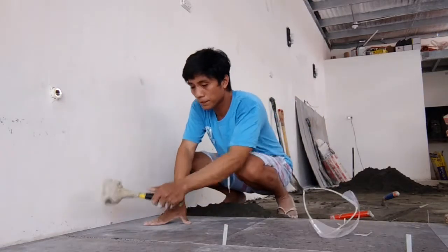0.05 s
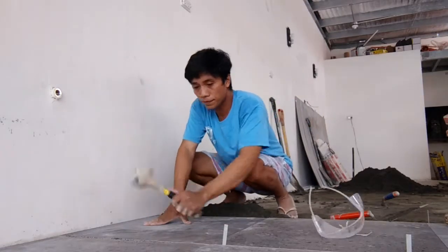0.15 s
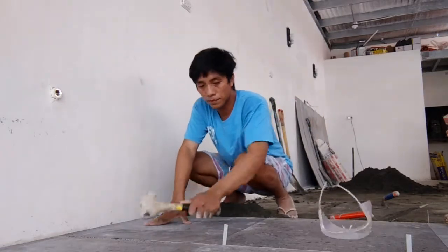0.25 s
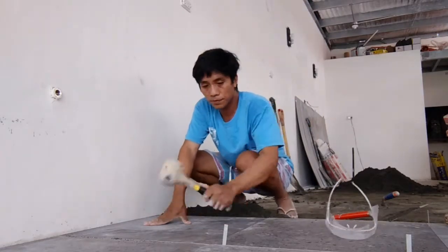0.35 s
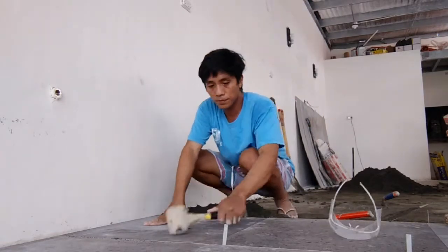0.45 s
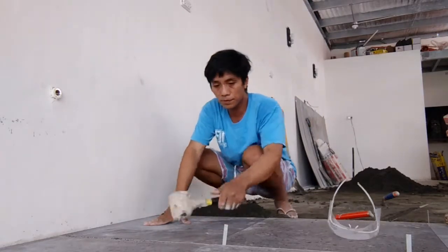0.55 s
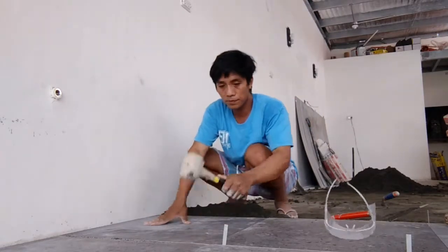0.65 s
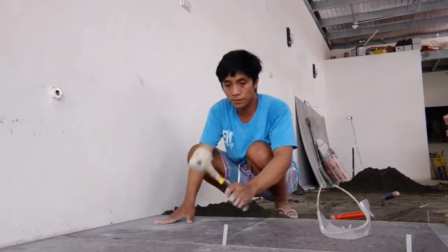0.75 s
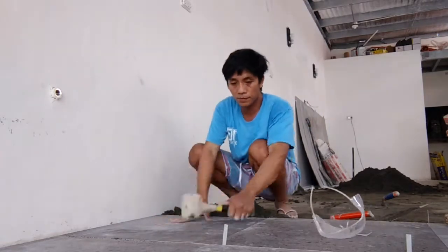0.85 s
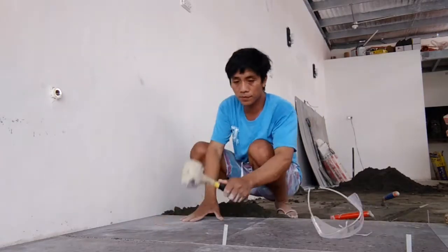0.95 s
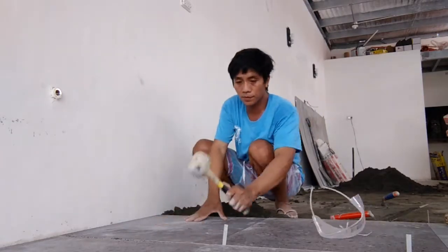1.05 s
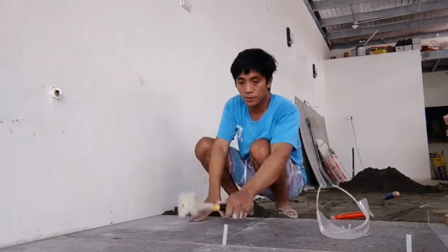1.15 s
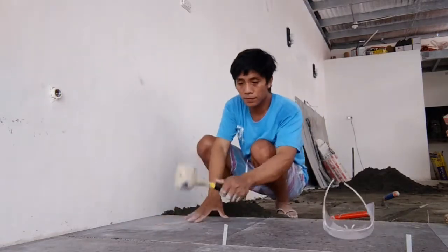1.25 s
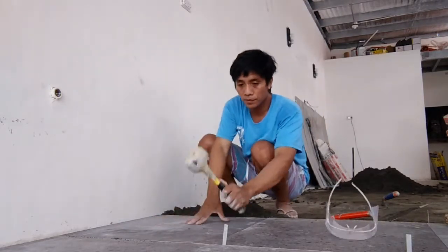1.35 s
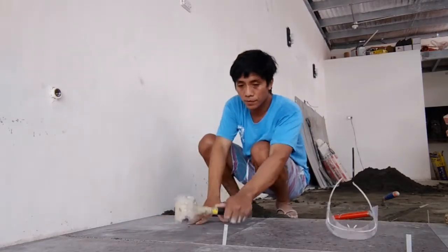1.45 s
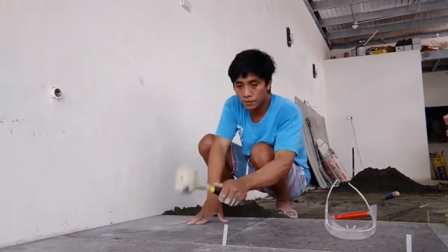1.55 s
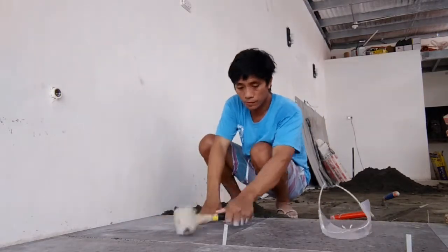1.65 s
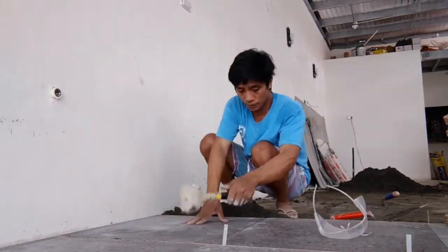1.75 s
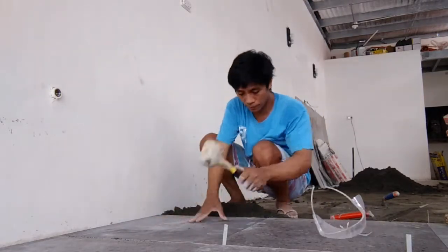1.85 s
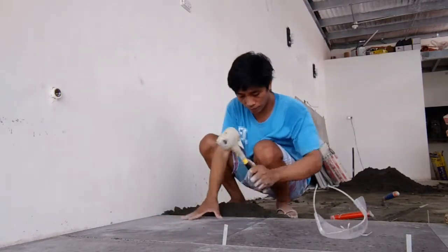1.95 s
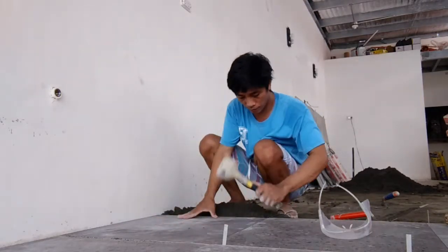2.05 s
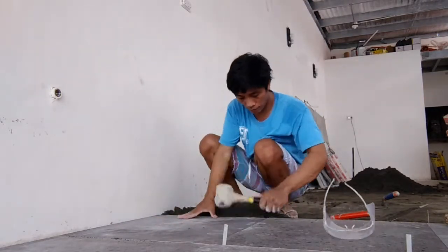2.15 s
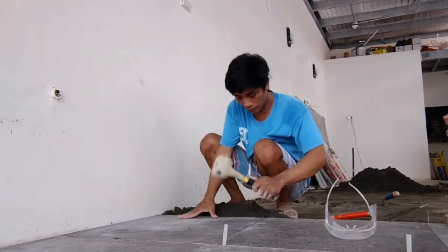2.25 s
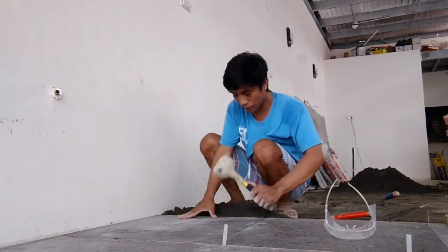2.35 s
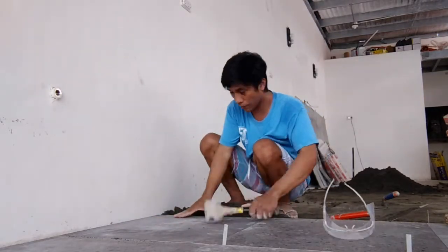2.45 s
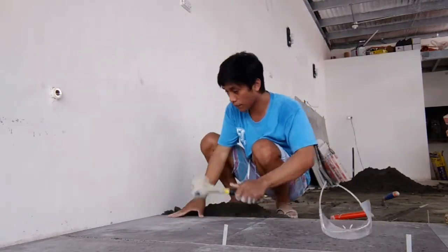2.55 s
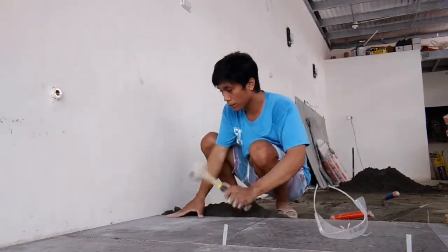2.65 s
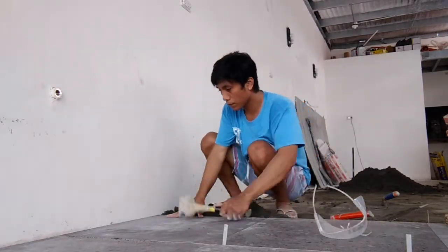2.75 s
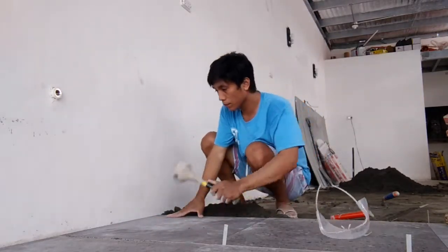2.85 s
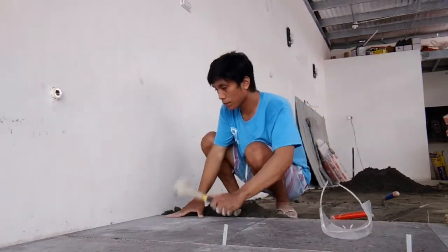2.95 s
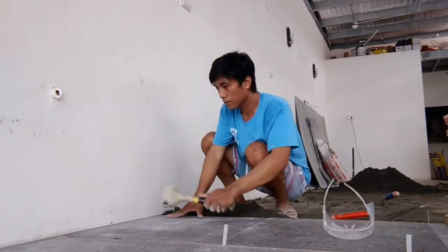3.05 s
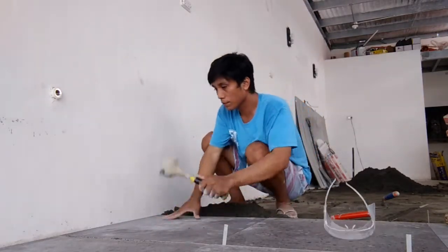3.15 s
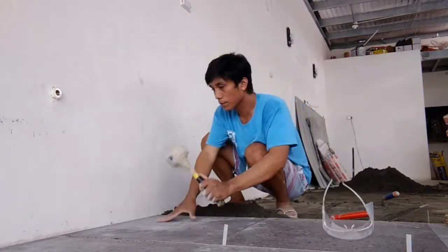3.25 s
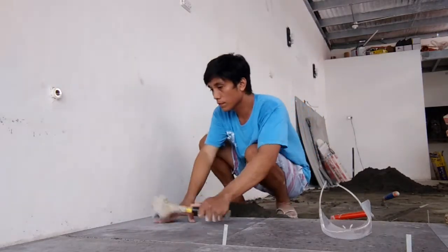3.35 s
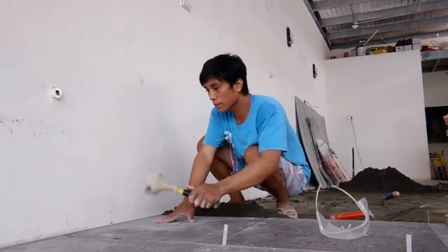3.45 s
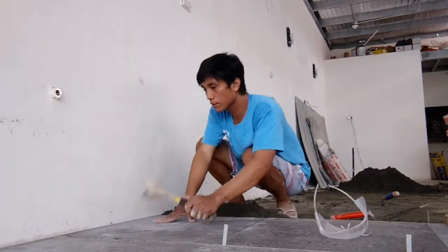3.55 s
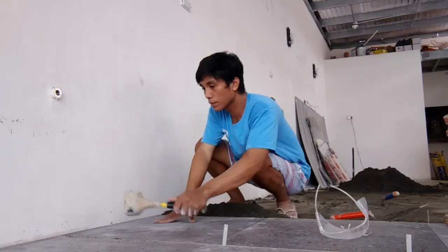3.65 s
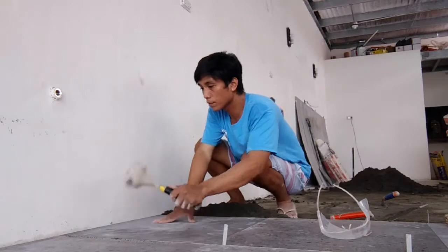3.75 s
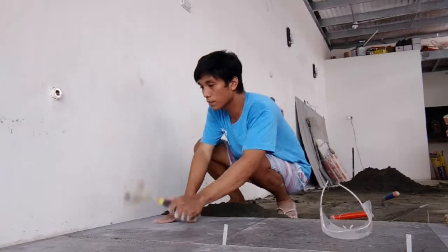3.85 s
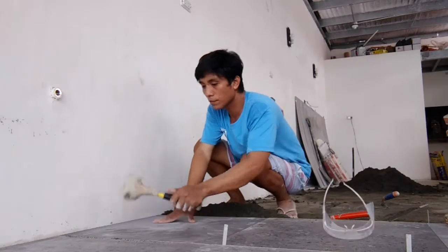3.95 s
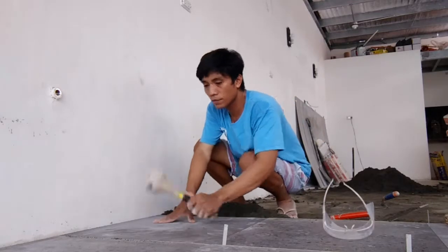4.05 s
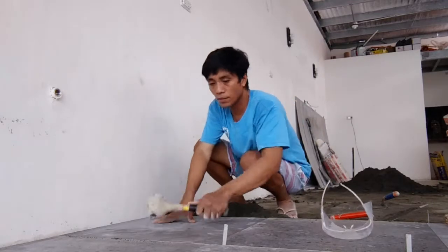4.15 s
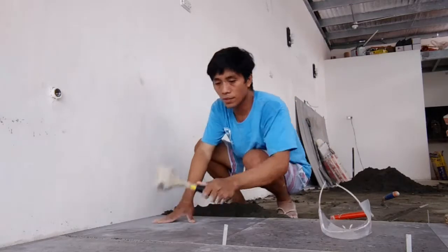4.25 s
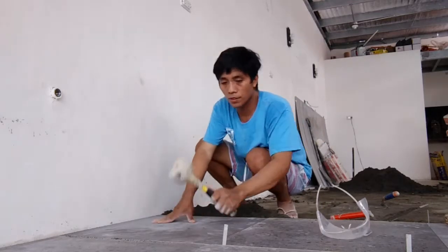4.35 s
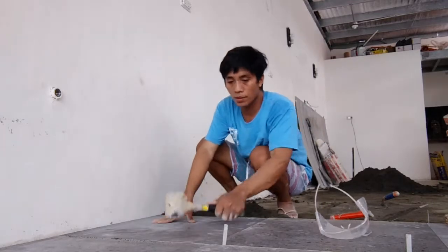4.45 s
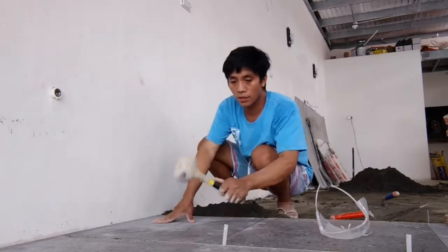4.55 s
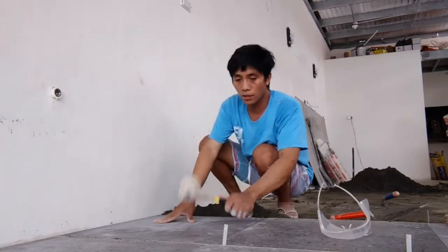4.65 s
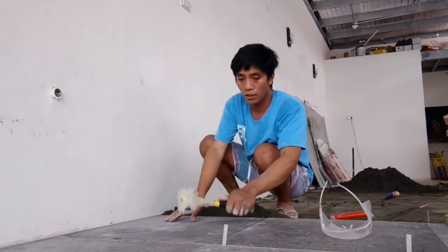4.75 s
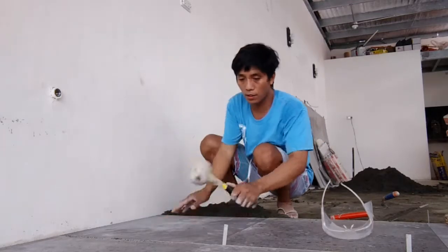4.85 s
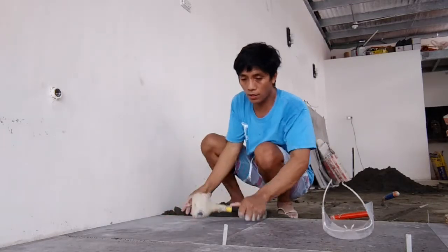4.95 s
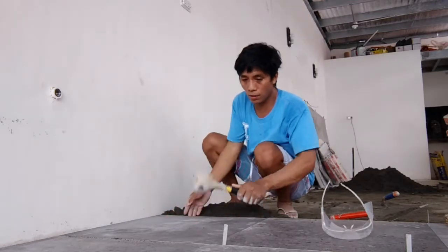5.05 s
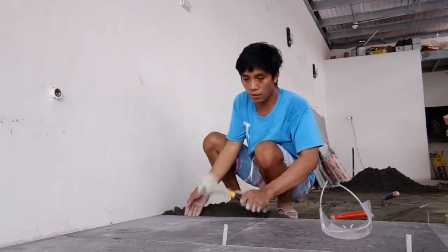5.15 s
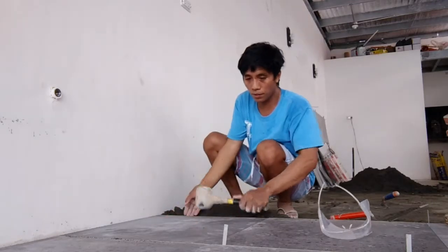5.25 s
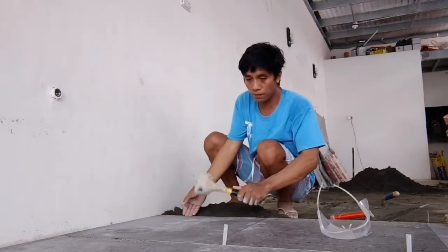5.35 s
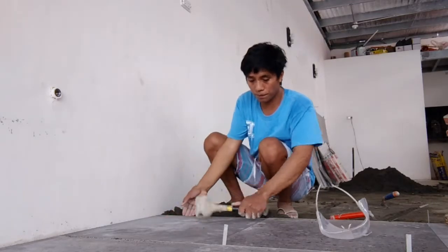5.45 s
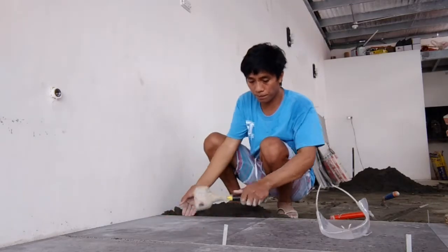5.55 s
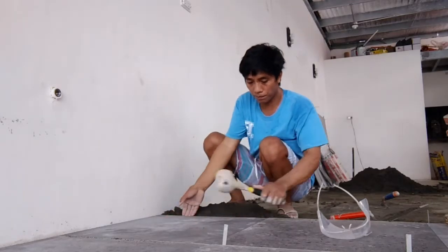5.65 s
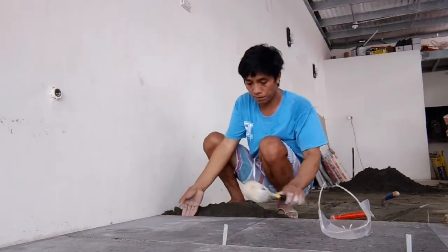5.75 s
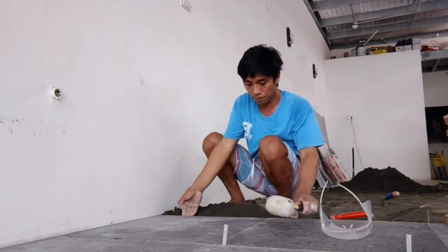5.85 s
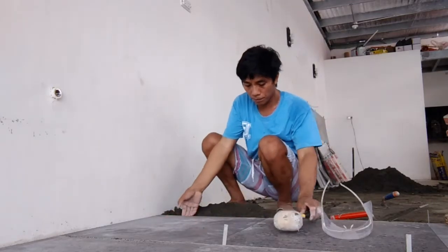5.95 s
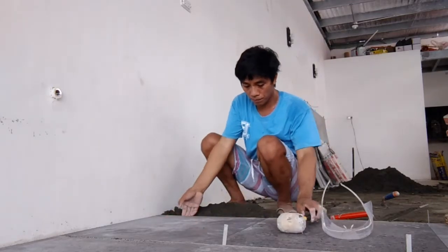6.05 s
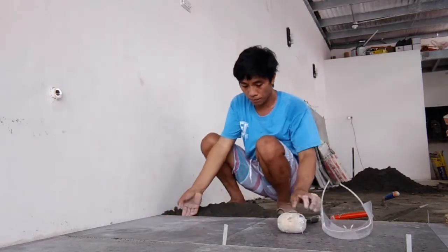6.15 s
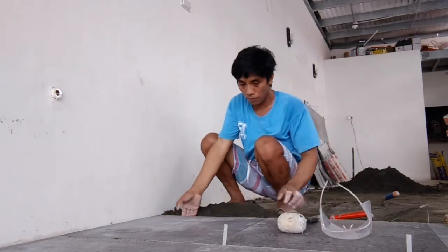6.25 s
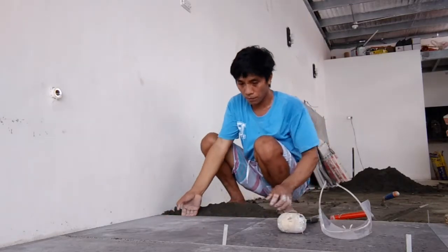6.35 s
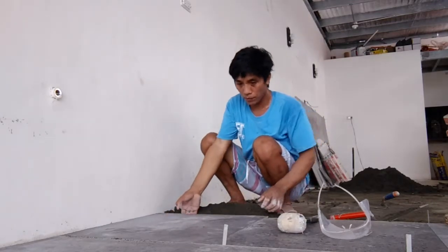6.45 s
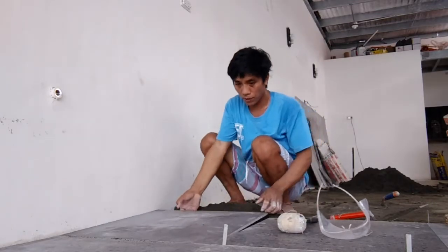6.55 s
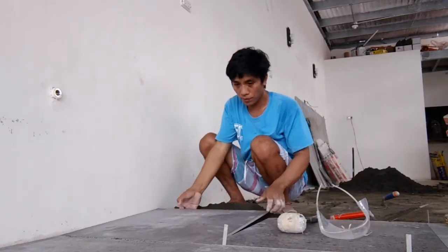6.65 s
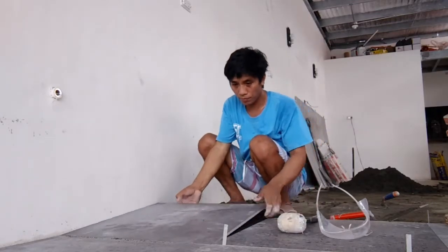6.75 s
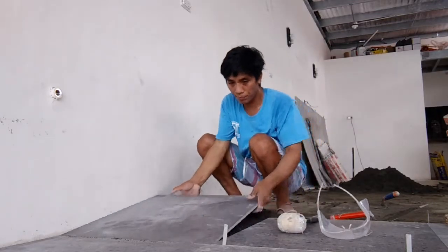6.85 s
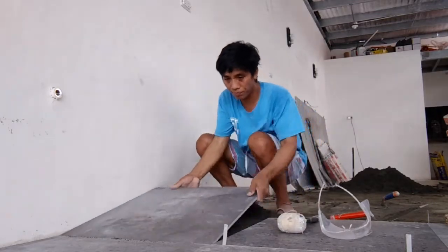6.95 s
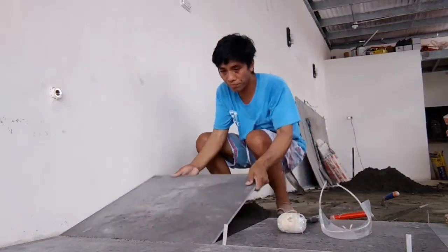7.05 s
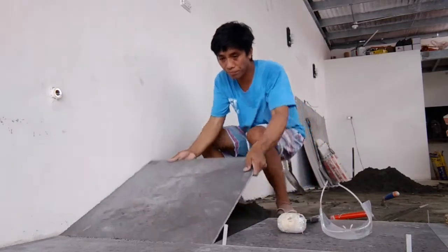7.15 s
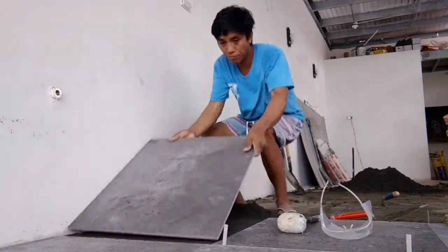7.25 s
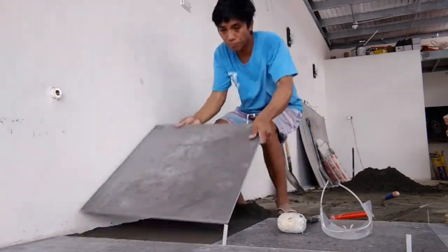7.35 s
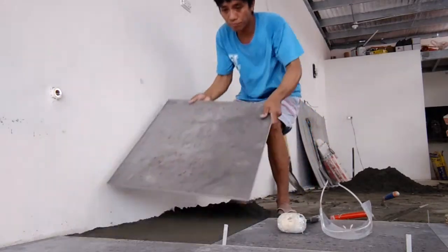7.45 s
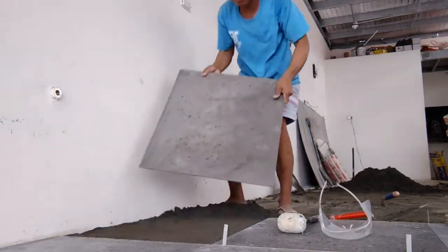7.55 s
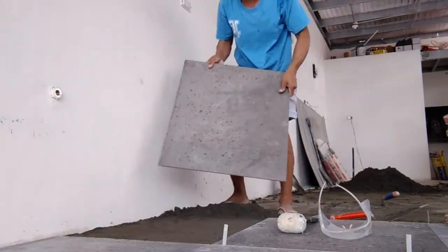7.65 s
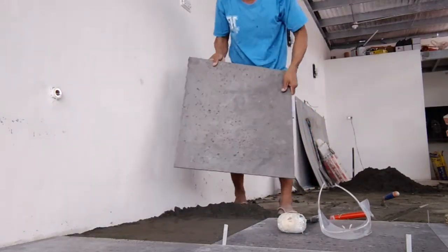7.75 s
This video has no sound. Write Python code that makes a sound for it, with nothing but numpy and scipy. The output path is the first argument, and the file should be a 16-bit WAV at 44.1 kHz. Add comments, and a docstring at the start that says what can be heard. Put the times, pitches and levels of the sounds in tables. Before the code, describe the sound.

Even, hollow mallet blows seat a floor tile in mortar, echoing off bare walls, followed by a few knocks and a soft rasp.

```python
"""A rubber mallet knocks a big floor tile into its mortar bed: twenty even blows in a bare, echoing room.
Each blow bends the tile and sets tile and room ringing; a limiter flattens the loudest moments.
Outdoor rumble comes in under the roof. Between blows a hand slides over the dusty tile, with light
taps and three faint chirps. Then the mallet is laid down and the tile is lifted: the mortar rasps,
and the tile's edge grazes a neighbour and rings."""
import sys
import numpy as np
from scipy import signal
from scipy.fft import rfft, irfft, next_fast_len
from scipy.io import wavfile
from scipy.ndimage import uniform_filter1d

SR = 44100
rng = np.random.default_rng(int(sys.argv[2]) if len(sys.argv) > 2 else 0)


def store_wav(level_fs):
    """Save 16-bit WAV to argv[1]."""
    pcm = np.round(np.clip(np.atleast_2d(level_fs), -1, 1) * 32767)
    wavfile.write(sys.argv[1], SR, pcm.T.astype(np.int16))


N = 343230
TIME = np.arange(N) / SR
HIT_SAMPLES = 32768  # long enough for one hit and its echo
HIT_TIME = np.arange(HIT_SAMPLES) / SR
HIT_HZ = np.arange(HIT_SAMPLES // 2 + 1) * SR / HIT_SAMPLES


def from_db(db):
    """Turn decibels into a number to multiply a sound by."""
    return 10 ** (np.asarray(db) / 20)


def unit_level(sound):
    """Scale a sound to an average (rms) level of 1."""
    return sound / np.sqrt(np.mean(sound ** 2) + 1e-20)


def at_pitch(rows, hz):
    """Read between the rows of a (pitch_hz, value) table, giving each octave equal space."""
    table = np.array(rows)
    return np.interp(np.log(np.maximum(hz, 1)), np.log(table[:, 0]), table[:, 1])


def add(out, start_s, sound):
    """Mix a sound in at its start time."""
    start = int(start_s * SR)
    part = sound[max(-start, 0):N - start]
    out[max(start, 0):][:len(part)] += part


def coloured(sound, tone):
    """Make each pitch louder or softer by a (pitch_hz, level_db) table."""
    size = next_fast_len(len(sound) + 4096, True)
    gain = from_db(at_pitch(tone, np.arange(size // 2 + 1) * SR / size))
    # minimum phase: nothing comes out before the sound goes in
    cepstrum = irfft(np.log(gain), size)
    cepstrum[1:size // 2] *= 2
    cepstrum[size // 2 + 1:] = 0
    return irfft(rfft(sound, size) * np.exp(rfft(cepstrum)), size)[:len(sound)]


def evened(sound, width_hz):
    """Even out the energy across bands of this width, as many paths together do."""
    power = uniform_filter1d(np.abs(rfft(sound)) ** 2, max(int(width_hz / HIT_HZ[1]), 1))
    gain_db = -10 * np.log10(np.maximum(power, .05))
    return coloured(sound, np.c_[HIT_HZ, gain_db][1:])


def noise(tone):
    """Steady noise with the given tone."""
    return unit_level(coloured(rng.standard_normal(N), tone))


def ringing(notes):
    """Struck notes, alternating in sign; each fades by 60 dB in its ring_s."""
    return sum((-1) ** k * from_db(db - 60 * HIT_TIME / ring_s) * np.sin(2 * np.pi * hz * HIT_TIME)
               for k, (hz, db, ring_s) in enumerate(notes))


def stirred(notes, width_hz):
    """Notes kept going by random pushes."""
    pushes = rng.standard_normal(N)
    return sum(from_db(db) * unit_level(signal.lfilter(*signal.iirpeak(hz, hz / width_hz, fs=SR), pushes))
               for hz, db in notes)


def stroke(peak_s, hold_s, level_db, rise_s, fall_s):
    """Loudness of one rub: it swells until peak_s, holds and dies away."""
    early = np.maximum(peak_s - TIME, 0)
    late = np.maximum(TIME - peak_s - hold_s, 0)
    return from_db(level_db) * np.exp(-early / rise_s - late / fall_s)


def with_echo(sound, room, echo_gain):
    """A sound plus the room's answer to it."""
    return sound + echo_gain * signal.fftconvolve(sound, room)[:N]


# How long the room's echo takes to fade by 60 dB: pitch_hz, ring_s
ROOM_RING = [(60, 0.25), (180, 0.37), (500, 0.42), (1500, 0.36), (4000, 0.41), (12000, .3)]

def room_echo(build_s):
    """Reflections crowd in, then die away, each band of pitches at its own pace."""
    spectrum = rfft(rng.standard_normal(HIT_SAMPLES))
    edges_hz = np.r_[0, np.geomspace(90, 2400, 13), 5000, 18000]
    build = 1 - np.exp(-HIT_TIME / build_s)
    out = np.zeros(HIT_SAMPLES)
    for low, high in zip(edges_hz, edges_hz[1:]):
        band = irfft(spectrum * ((HIT_HZ >= low) & (HIT_HZ < high)))
        band *= build * np.exp(-np.log(1000) * HIT_TIME / at_pitch(ROOM_RING, (low + high) / 2))
        out += band * np.sqrt(2 * (high - low) / SR / np.sum(band ** 2))  # equal energy per hertz
    return out


# Tone of the short snap as the tile bends: pitch_hz, level_db
SNAP_TONE = [(40, 13.5), (100, 29), (190, 49.5), (320, 28.5), (560, 34.5), (800, 28), (1000, 21),
             (1400, 27), (2000, 12.5), (3000, 2.5), (5000, -14), (9000, -19.5), (16000, -30)]

def tile_snap(lag_s=0.000473, spread_s=0.00183, knee_hz=560, near_wall_s=0.003152, scatter_s=0.00195):
    """Bending waves cross the tile, high ones first; the near wall repeats them at once."""
    delay_s = lag_s + spread_s / np.sqrt(1 + HIT_HZ / knee_hz)
    wave = np.exp(-2j * np.pi * np.cumsum(delay_s) * SR / HIT_SAMPLES)
    bounce_s = near_wall_s * rng.uniform(0.815, 1.196)
    bend = irfft(wave * (1 + np.exp(-2j * np.pi * HIT_HZ * bounce_s)))
    # grains of mortar and the tile's edges scatter the wave
    grains = rng.standard_normal(HIT_SAMPLES) * HIT_TIME * np.exp(-HIT_TIME / scatter_s)
    scattered = bend + grains / np.linalg.norm(grains)
    return coloured(evened(scattered, width_hz=400), SNAP_TONE)


# Mallet blows; a firmly bedded spot sounds brighter than a soft one: start_s, strength_db, bright_db
BLOWS = [(0.0516, -4, -1), (0.3113, -1.2, 0.6), (0.5598, -2, -0.5), (0.9321, -1, 0.5), (1.223, -0.7, 1.5),
         (1.5314, 0, 1), (1.7919, -0.5, 1), (2.2467, -6, 1.5), (2.5244, -4.5, 2.3), (2.8143, -5.5, 1),
         (3.086, -4.5, 0.2), (3.438, -1.5, -1.5), (3.69, -0.5, -0.5), (3.9539, -1.5, 0.2), (4.1984, 0, 0.5),
         (4.5121, -1, -0.6), (4.7862, -1, -0.5), (5.0586, -4, -1), (5.3286, -7.5, -0.5),
         (5.5751, -5.5, -0.2)]
# Tone of a blow as the walls send it back: pitch_hz, level_db
ECHO_TONE = [(40, 16.5), (70, 33), (120, 41), (200, 44), (290, 38), (480, 40.5), (750, 30.5), (1150, 25.5),
             (1420, 24.5), (2050, 20.5), (3000, 7.5), (4700, -6), (6500, -19.5), (15000, -34)]
# Long-ringing notes of tile and room: pitch_hz, level_db, ring_s
BLOW_NOTES = [(95.4, -24, 0.42), (108.7, -29.5, 0.74), (139.5, -21, 0.85), (155.7, -19.5, 0.47),
              (175.4, -19, 0.19), (182.3, -11.5, 0.73), (195.5, -14.5, 0.64), (213.1, -18, 0.89),
              (257.8, -17, 0.47), (315.5, -20.5, 0.5), (345.5, -21.5, 0.32), (397.4, -18.5, 0.58),
              (426.6, -24, 0.16), (448, -15, 0.43), (517, -19, 0.11), (510, -22.5, 0.11),
              (694.5, -17, 0.32), (824, -27, 0.35), (972, -24, 0.31), (1059, -27.5, 0.19),
              (1406, -22.5, 0.31), (1888, -26.5, 0.32), (2860, -41.5, 0.4)]

def mallet_blows(room, snap_db=-0.1, snap_follows=0.27, spot_db=3.0, spot_hz=1500):
    """Each blow lands on a new spot, so the tile bends differently and the echo takes other paths."""
    ring = ringing(BLOW_NOTES)
    pitches_hz = np.geomspace(60, 16000, 90)
    treble_share = at_pitch([(220, 0), (900, 1)], pitches_hz)
    middle_share = np.exp(-np.log(pitches_hz / spot_hz) ** 2)
    # low sounds find the same paths every time, high ones do not
    path_change = 1.03 * HIT_HZ ** 2 / (HIT_HZ ** 2 + 750 ** 2)
    # the far walls send back a cluster of reflections: 1.5 dB extra after 59 ms
    far_walls = from_db(1.5 * np.exp(-((HIT_TIME - 0.059) / 0.02) ** 2))
    out = np.zeros(N)
    add(out, -.22, coloured(room, ECHO_TONE) + ring)  # an earlier blow is still dying away
    for start_s, strength_db, bright_db in BLOWS:
        new_paths = room_echo(build_s=0.013)
        paths = irfft(np.cos(path_change) * rfft(room) + np.sin(path_change) * rfft(new_paths))
        echo = coloured(paths * far_walls, ECHO_TONE)
        snap = from_db(snap_db + snap_follows * strength_db) * tile_snap()
        blow = from_db(strength_db) * (echo + ring) + snap
        # the spot matters most for the middle pitches
        spot_tone_db = spot_db * middle_share * rng.standard_normal(len(pitches_hz))
        add(out, start_s, coloured(blow, np.c_[pitches_hz, bright_db * treble_share + spot_tone_db]))
    return out


# Tone of the outdoor rumble: pitch_hz, level_db
RUMBLE_TONE = [(25, -28), (42, -19.5), (60, -4), (85, 4), (125, 3.5), (170, -6.5), (260, 1), (350, -7),
               (550, -3.5), (1000, -10.5), (2000, -17.5), (4300, -32), (6500, -48.5), (15000, -72.5)]
# Low room notes that the rumble stirs: pitch_hz, level_db
BOOM_NOTES = [(58, -16.5), (141, -11), (196, -16.5)]
# Tone of the thin background hiss: pitch_hz, level_db
HISS_TONE = [(3000, 3), (6500, -5), (9500, 1), (12000, -15.5), (15500, -10.5)]
# One slow swell of rumble, boom and hiss together: time_s, level_db
OUTDOOR_SWELL = [(0, -35), (3, -36), (4, -33.5), (5, -27.5), (7.3, -29), (7.75, -32.5)]

def outdoor_rumble(rumble_db=-5.0, hiss_db=-38):
    """A distant rumble makes the room boom on its lowest notes, with a thin hiss on top."""
    cut_treble = signal.butter(2, 400, fs=SR, output="sos")
    boom = signal.sosfilt(cut_treble, stirred(BOOM_NOTES, width_hz=12.0))
    rumble = from_db(rumble_db) * noise(RUMBLE_TONE)
    hiss = from_db(hiss_db) * noise(HISS_TONE)
    swell = from_db(np.interp(TIME, *np.transpose(OUTDOOR_SWELL)))
    return swell * (rumble + boom + hiss)


# Strokes of the hand: peak_s, hold_s, level_db
HAND_STROKES = [(.272, .025, -51), (.795, .11, -43), (3.23, .05, -56), (3.86, .06, -59), (4.12, .06, -54)]
# Tone of skin brushing over dust: pitch_hz, level_db
SKIN_TONE = [(200, -16), (800, 7.5), (1900, 7), (2800, 0.5), (3800, 0), (5500, -18), (8500, -22.5),
             (11500, -30), (15000, -45)]
# Notes of skin squeaking on the tile: pitch_hz, level_db
SQUEAK_NOTES = [(1770, -2), (2210, -4), (3460, -8), (4820, -17), (6160, -22.5), (6910, -27), (8350, -28),
                (9600, -31)]

def hand_slides(hiss_db=0.5):
    """Skin hisses and faintly squeaks on the dusty tile; a longer stroke gathers speed for longer."""
    skin = from_db(hiss_db) * noise(SKIN_TONE) + stirred(SQUEAK_NOTES, width_hz=26)
    movement = sum(stroke(peak_s, hold_s, level_db, rise_s=.33 * hold_s, fall_s=0.018)
                   for peak_s, hold_s, level_db in HAND_STROKES)
    return movement * skin


# Small touches of mallet, fingers and grit: start_s, knock_db, tick_db
TOUCHES = [(1.7225, -31, -28.5), (1.909, -63, -35), (3.192, -55, -28), (4.3616, -64.5, -35),
           (5.0001, -56, -34), (6.105, -19, -25), (6.168, -30, -26.5), (6.222, -10.5, -38)]

def light_taps(room):
    """Each light touch makes a dull knock and a shorter, gritty tick."""
    # both tones: pitch_hz, level_db
    knock_tone = [(100, -22.5), (450, 11), (900, 5.5), (2000, -4.5), (4000, -35), (9000, -47)]
    tick_tone = [(500, -39), (3000, -7.5), (9000, -17.5), (15000, -25)]
    out = np.zeros(N)
    for start_s, knock_db, tick_db in TOUCHES:
        burst = rng.standard_normal(HIT_SAMPLES) * np.exp(-HIT_TIME / 0.0044)
        knock = coloured(burst, knock_tone)
        tick = coloured(burst * np.exp(-HIT_TIME / 0.0017), tick_tone)
        add(out, start_s, from_db(knock_db) * knock + from_db(tick_db) * tick)
    return with_echo(out, room, echo_gain=0.72)


# Faint high chirps: peak_s, pitch_hz, level_db
HIGH_CHIRPS = [(5.178, 3770, -41.5), (5.239, 3670, -41.5), (5.275, 3920, -49)]

def faint_chirps(room, fade_s=0.0047):
    """Short, thin whistles fade in and out, smeared by the room."""
    out = np.zeros(N)
    for peak_s, pitch_hz, level_db in HIGH_CHIRPS:
        loudness = from_db(level_db) * np.exp(-((TIME - peak_s) / fade_s) ** 2)
        out += loudness * np.sin(2 * np.pi * pitch_hz * TIME)
    return with_echo(out, room, echo_gain=0.96)


# Tone of the dragging mortar: pitch_hz, level_db
MORTAR_TONE = [(200, -25), (450, 4), (590, 3), (720, 4), (1000, -8), (3000, -55)]

def mortar_rasp():
    """Mortar rasps as the tile is pulled away from it."""
    pull = stroke(peak_s=6.84, hold_s=0.065, level_db=-36, rise_s=0.14, fall_s=.06)
    return pull * noise(MORTAR_TONE)


# Notes of the freed tile's edge: pitch_hz, level_db, ring_s
EDGE_NOTES = [(1113, 5, 0.04), (1510, 7, 0.1), (1930, 7, 0.063), (2080, 4, 0.08), (2500, -1, .08),
              (2700, -11, 0.092), (3600, -8, .04), (5530, -19, 0.086)]
# Tone of the grit between two tile edges: pitch_hz, level_db
GRIT_TONE = [(500, -23), (1500, -4), (2300, 11), (3000, -1), (4000, -7), (6000, -21), (8000, -18),
             (10500, -19), (12000, -27), (15000, -27)]

def edge_graze(room, slips_per_s=1600, grit_db=9):
    """Quick gritty slips of one edge on another set the freed tile ringing."""
    contact = stroke(peak_s=7.285, hold_s=0.037, level_db=-49, rise_s=0.0037, fall_s=0.014)
    slips = (rng.random(N) < slips_per_s / SR) * rng.choice([-1, 1], N) * contact
    ring = signal.fftconvolve(slips, ringing(EDGE_NOTES))[:N]
    grit = from_db(grit_db) * contact * noise(GRIT_TONE)
    return with_echo(ring + grit, room, echo_gain=0.35)


def scene():
    """Mix all the sounds; blows, taps, chirps and the graze share one room's echo."""
    room = evened(room_echo(build_s=0.0029), width_hz=22)
    mix = mallet_blows(room) + outdoor_rumble() + hand_slides() + light_taps(room)
    mix += faint_chirps(room) + mortar_rasp() + edge_graze(room)
    return mix[None]


def record(dry, limit_db=-3.5, attack_s=0.0069, release_db_per_s=130, ceiling=.76, cutoff_hz=15600):
    """A limiter quickly turns loud blows down; leftover peaks are rounded and the top treble is cut."""
    over_db = np.maximum(20 * np.log10(np.abs(dry[0]) + 1e-9) - limit_db, 0)
    recovery_db = release_db_per_s * TIME
    held_db = np.maximum.accumulate(over_db + recovery_db) - recovery_db
    smoothing = np.exp(-1 / (attack_s * SR))
    turn_down_db = signal.lfilter([1 - smoothing], [1, -smoothing], held_db)
    limited = dry * from_db(-turn_down_db)
    rounded = limited / (1 + (limited / ceiling) ** 8) ** (1 / 8)
    return signal.sosfilt(signal.ellip(10, .1, 80, cutoff_hz, fs=SR, output="sos"), rounded)


dry = scene()
out = record(dry)
store_wav(out)
```